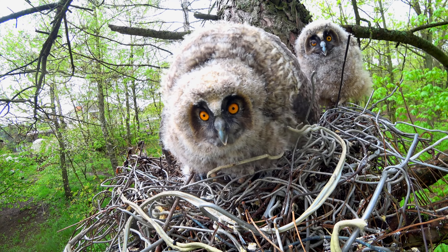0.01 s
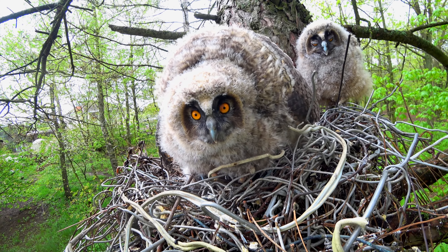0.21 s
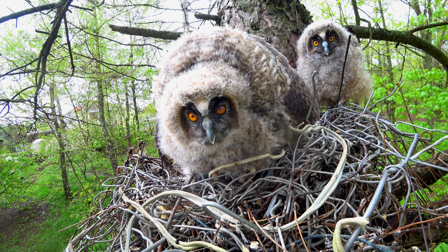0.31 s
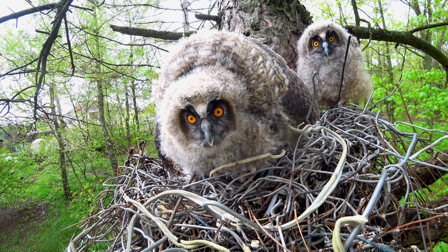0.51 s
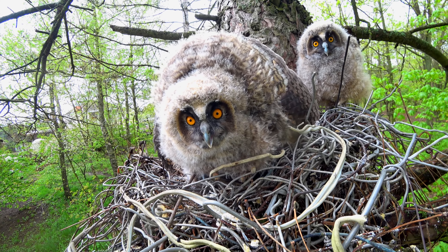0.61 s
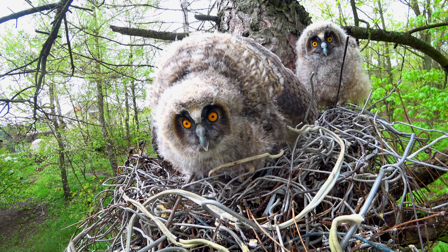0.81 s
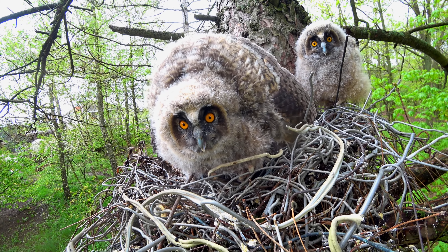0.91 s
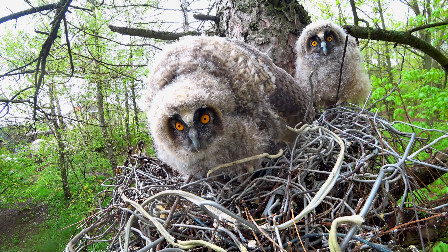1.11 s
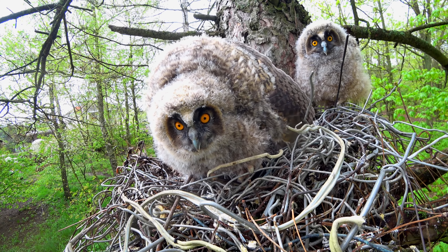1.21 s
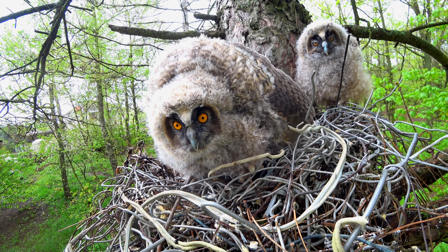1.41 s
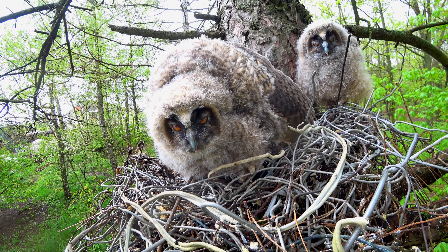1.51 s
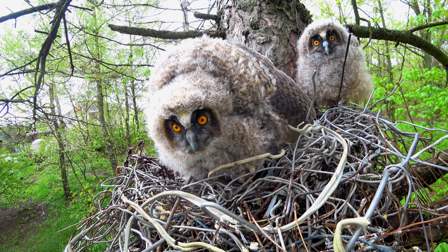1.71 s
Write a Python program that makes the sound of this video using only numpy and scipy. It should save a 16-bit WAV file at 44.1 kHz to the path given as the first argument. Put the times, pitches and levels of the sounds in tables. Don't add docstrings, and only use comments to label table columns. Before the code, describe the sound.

An owl chick hisses and snaps its bill close to a small outdoor microphone. Dry ticks at 0.14-0.16 s lead to a sharp, hollow clap at 0.22. A bright, breathy hiss starts abruptly near 0.35, peaks around 0.6 and fades by 0.92. A second clap hits at 1.08, with slight tree echo. Soft woodland wash continues, with faint high insect bursts, far peeps and low coos around 1.35-1.67.

```python
import sys
import numpy as np
from scipy import signal
from scipy.fft import rfft, irfft
from scipy.io import wavfile
from scipy.ndimage import uniform_filter1d

SR = 44100
rng = np.random.default_rng(int(sys.argv[2]) if len(sys.argv) > 2 else 0)


def invert_db(level):
    return 10 ** (np.asarray(level, dtype=float) / 20)


def pcm_store(signal):
    levels = np.round(np.clip(np.atleast_2d(signal), -1, 1) * 32767)
    wavfile.write(sys.argv[1], SR, levels.astype(np.int16).T)


N = 79380
EDGE_HZ = 15760


def evened(x):
    return x / np.sqrt(np.mean(x ** 2) + 1e-20)


def read(points, hz):
    f, value = np.transpose(points)
    return np.interp(np.log(hz + 1), np.log(f + 1), value)


def add(mix, s, sound):
    part = mix[round(s * SR):][:len(sound)]
    part += sound[:len(part)]


def coloured(x, gain):
    hz = np.fft.rfftfreq(x.shape[-1], 1 / SR)
    return irfft(rfft(x) * gain(hz), x.shape[-1])


def bell(hz, centre_hz, width_hz):
    return 1 / (1 + (2 * (hz - centre_hz) / width_hz) ** 2)


def field(patch_db, flicker_db):
    frames = N // 128 + 5
    a, b, c, d, patches = rng.standard_normal((frames, 257, 5)).T
    patches = uniform_filter1d(patches, 6, 0)
    patches = evened(uniform_filter1d(patches, 16, 1))
    flicker = evened(uniform_filter1d(rng.standard_normal(frames), 5))
    return a + 1j * b, c + 1j * d, invert_db(patch_db * patches + flicker_db * flicker)


def sound_of(z):
    x = signal.istft(z, nperseg=512, noverlap=384)[1][..., :N]
    return coloured(x, lambda hz: hz < EDGE_HZ)


def wood():
    # frequency in Hz, level in dB.
    wash = [(40, -29), (150, -22.5), (400, -6.5), (760, -6.5), (1500, -6), (4500, -18), (5900, -20),
            (16000, -25)]
    # centre in Hz, width in Hz, lift in dB.
    hollow = (1060, 260, 6)
    # frequency in Hz, correlation from -1 to 1.
    likeness = [(60, .98), (250, 0.97), (600, 0.34), (1600, .6), (5000, 0.27), (15000, 0.17)]
    # frequency in Hz, left over right in dB.
    balance = [(60, -0.32), (240, -1.4), (950, 0.23), (3770, 0.77), (15000, 1.0)]
    left_lag_s = 0.00026
    hz = np.fft.rfftfreq(512, 1 / SR)
    left, other, drift = field(patch_db=1.0, flicker_db=0.44)
    same = np.clip(read(likeness, hz), -1, 1)[:, None]
    tilt = invert_db(read(balance, hz) / 2)[:, None]
    turn = np.exp(2j * np.pi * hz * left_lag_s)[:, None]
    right = same * left * turn + np.sqrt(1 - same ** 2) * other
    hollow_hz, width_hz, lift_db = hollow
    colour = invert_db(read(wash, hz) + lift_db * bell(hz, hollow_hz, width_hz))[:, None]
    sides = np.array([left * tilt, right / tilt])
    return invert_db(-59) * evened(sound_of(sides * drift * colour))


def whistles(rows, width_hz, edge_s, rough):
    out = np.zeros(N)
    for s, length, db, hz0, hz1 in rows:
        t = np.arange(0, length, 1 / SR)
        pole = np.exp(-np.pi * width_hz / SR)
        noise = rng.standard_normal((len(t), 2)) @ [1, 1j]
        waver = 1 + rough * signal.lfilter([np.sqrt(1 - pole * pole)], [1, -pole], noise)
        phase = 2 * np.pi * np.cumsum(hz0 + (hz1 - hz0) * t / length) / SR
        tone = (waver * np.exp(1j * phase)).real
        fade = np.clip(np.minimum(t, length - t) / edge_s, 0, 1)
        add(out, s, invert_db(db) * tone * fade)
    return out


def insect():
    # start in seconds, length in seconds, level in dB, first and last pitch in Hz.
    bursts = [
        (0.0, .048, -73, 11250, 11250),
        (.905, .05, -73, 11250, 11250),
        (.96, .055, -73, 11250, 11250),
        (1.458, .095, -73, 11250, 11250),
        (1.772, .04, -73, 11250, 11250),
    ]
    return whistles(bursts, width_hz=80, edge_s=.004, rough=.3)


def birds():
    # start in seconds, length in seconds, level in dB, first and last pitch in Hz.
    calls = [
        (.09, .06, -73, 3850, 3950),
        (.27, .06, -75, 5350, 5400),
        (.28, .04, -74, 4000, 4000),
        (1.27, .06, -72, 4700, 4600),
        (1.37, .08, -77, 4700, 4600),
        (1.31, .07, -74, 3300, 3200),
        (1.61, .05, -70, 3700, 3500),
        (1.3, .1, -76, 4400, 4450),
    ]
    return whistles(calls, width_hz=250, edge_s=.012, rough=.8)


def ring(modes, pitch=0.94, cut_hz=900):
    out = np.zeros(800)
    for hz, db, t60, delay in modes:
        t = np.maximum(np.arange(800) / SR - delay, 0)
        out -= invert_db(db - 60 * t / t60) * np.sin(2 * np.pi * hz * pitch * t)
    band = signal.butter(2, [cut_hz, EDGE_HZ], "band", fs=SR, output="sos")
    return signal.sosfilt(band, out)


def bill_ticks():
    # start in seconds, level in dB.
    partings = [
        (.1351, -50),
        (.1393, -62),
        (.16385, -25),
    ]
    # frequency in Hz, level in dB, 60 dB decay in seconds, delay in seconds.
    tick_modes = [(14400, -6, 0.0015, 0.000083), (15500, 6, .002, 0.000082), (12300, -1, 0.0013, 0.000087),
                  (10700, -10, 0.0022, 0.00008), (6550, -12, 0.0023, 0.000039),
                  (4260, -4.5, 0.0032, 0.00018), (2820, -17, 0.0034, .0003), (1340, -18, 0.01, 0.00066),
                  (8200, -8, 0.0013, 0.000067)]
    out = np.zeros(N)
    for s, db in partings:
        add(out, s, invert_db(db) * ring(tick_modes))
    return out


def bill_snaps():
    # start in seconds, level in dB, lead of the tip tick in seconds, tip level in dB, pitch factor.
    claps = [
        (.21669, 1, .00535, -18, 1.0),
        (1.08258, 1.5, .0055, -18.5, 1.0),
    ]
    # frequency in Hz, level in dB, 60 dB decay in seconds, delay in seconds.
    horn_modes = [(4540, -19.5, 0.0033, 0.00019), (6800, -11, 0.0022, 0.0002247),
                  (10800, -8.5, 0.0011, 0.0003174), (11300, -19, 0.0011, 0.000197),
                  (15100, -52, 0.0044, .0001), (2900, -30, 0.0032, 0.00032)]
    # frequency in Hz, level in dB, 60 dB decay in seconds, delay in seconds.
    tip_modes = [(4800, -4, .007, .0001), (6200, -6, .006, .0001), (2700, -9, .004, .0001),
                 (3700, -11, .004, .0001), (7700, -11, .005, .0001), (10800, -22, .007, .0003),
                 (14600, -23, .007, .0001), (1600, -21, .007, .0006)]
    pop_top_hz, pop_low_hz, pop_fall_s = 4700, 1050, .0002
    pop_t60, pop_rise_s = 0.0027, .00005
    push_db, push_s = -27, 0.00017
    out, t = np.zeros(N), np.arange(800) / SR
    for s, db, ahead, tip_db, pitch in claps:
        hz = pop_low_hz * pitch + (pop_top_hz - pop_low_hz) * np.exp(-t / pop_fall_s)
        pop = -np.sin(2 * np.pi * np.cumsum(hz) / SR)
        pop *= (1 - np.exp(-t / pop_rise_s)) * invert_db(-60 * t / pop_t60)
        push = invert_db(push_db) * t / push_s * np.exp(1 - t / push_s)
        add(out, s, invert_db(db) * (pop - push + ring(horn_modes, pitch)))
        add(out, s - ahead, invert_db(tip_db) * ring(tip_modes))
    return out


def peaks(table, hz):
    power = sum(invert_db(db) ** 2 * bell(hz, f, width) ** 2.12 for f, width, db in table)
    return np.sqrt(power)


def hiss():
    # time in seconds, level in dB, throat share in dB.
    effort = [
        (0.335, -89, 33),
        (0.373, -47.5, -6),
        (0.385, -45, -4),
        (0.473, -37, -6),
        (0.599, -34.5, -3),
        (0.763, -37, -2),
        (0.879, -46, -1),
        (0.913, -66.5, 12),
        (0.925, -71, 5),
    ]
    # frequency in Hz, width in Hz, level in dB.
    tongue_jet = [(4590, 1950, -5), (6500, 1660, -3.5), (7370, 450, 3), (8370, 990, 2), (9320, 940, 1),
                  (11080, 1930, 0.5), (13400, 1700, -4), (15200, 1000, -6.5)]
    # frequency in Hz, width in Hz, level in dB.
    throat_modes = [(1490, 950, 0.5), (1860, 1430, 4.5), (2837, 410, 2), (3470, 1600, -5)]
    # frequency in Hz, width in Hz, depth in dB.
    cavities = [(5650, 500, -4), (10000, 300, -7), (7000, 200, -2)]
    hz = np.fft.rfftfreq(512, 1 / SR)
    jet_air, throat_air, drift = field(patch_db=.9, flicker_db=.6)
    dips = invert_db(sum(db * bell(hz, f, width) for f, width, db in cavities))
    throat_cut = 1 / np.sqrt(1 + (867 / (hz + 1)) ** 6)
    jet_gain = peaks(tongue_jet, hz) * dips
    throat_gain = peaks(throat_modes, hz) * throat_cut * dips
    jet = evened(sound_of(jet_air * drift * jet_gain[:, None]))
    throat = evened(sound_of(throat_air * drift * throat_gain[:, None]))
    s, level_db, share_db = np.transpose(effort)
    t = np.arange(N) / SR
    share = invert_db(np.interp(t, s, np.minimum(share_db, 4)))
    return invert_db(np.interp(t, s, level_db, -150, -150)) * (jet + throat * share)


def squeaks():
    # start in seconds, length in seconds, level in dB, first and last pitch in Hz.
    catches = [
        (.343, .035, -63, 5450, 6150),
        (.345, .03, -60, 11000, 12100),
    ]
    return whistles(catches, width_hz=150, edge_s=.01, rough=.35)


def coos():
    # start in seconds, length in seconds, level in dB, first and last pitch in Hz.
    low_calls = [
        (1.35, .165, -67, 600, 662),
        (1.49, .18, -66, 662, 630),
        (.865, .065, -58, 915, 925),
        (.92, .13, -68, 920, 920),
        (.9, .14, -69, 530, 530),
    ]
    return whistles(low_calls, width_hz=8, edge_s=.025, rough=.12)


def ports(x, direct=0.63, lag=-1.1, scatter=0.66):
    # frequency in Hz, side level in dB.
    side_curve = [(100, -23), (400, -10), (800, 2), (1300, -5), (2300, -12), (4400, -16), (8000, -25.5),
                  (15000, -23)]
    t = np.arange(260) / SR
    smear = rng.standard_normal(260) * invert_db(-60 * t / .008)
    loose = signal.oaconvolve(x, smear / np.linalg.norm(smear))[:N]
    side = coloured(scatter * loose, lambda hz: invert_db(read(side_curve, hz)))
    side += coloured(x, lambda hz: direct * invert_db(read(side_curve, hz)) * np.exp(1j * lag))
    return np.array([x + side, x - side])


def trees(x):
    # frequency in Hz, 60 dB decay in seconds.
    decay = [(300, 0.13), (2000, 0.47), (6000, 0.26), (12000, 0.12)]
    # frequency in Hz, level in dB.
    tone = [(200, -10), (1500, 0.5), (7000, 5), (11000, -3.5)]
    taps = np.zeros((2, SR // 2))
    at = np.arange(200, SR // 2 - 20, 20) + rng.integers(0, 20, (2, (SR // 2 - 201) // 20))
    np.put_along_axis(taps, at, rng.choice([-1., 1.], at.shape), 1)
    hz, t, z = signal.stft(taps, SR, nperseg=128)
    tail_db = read(tone, hz)[:, None] - 60 * t / read(decay, hz)[:, None]
    tail = signal.istft(z * invert_db(tail_db), SR, nperseg=128)[1]
    tail = invert_db(-33) * tail / np.linalg.norm(tail[0])
    return signal.fftconvolve(x[None], tail, axes=1)[:, :N]


def scene():
    chick = bill_ticks() + bill_snaps() + hiss() + squeaks()
    far = insect() + birds() + coos()
    return wood() + far * invert_db([[1.], [-1.]]) + ports(chick) + trees(chick)


def top_cut(x):
    return signal.sosfilt(signal.butter(12, 17090, fs=SR, output="sos"), x)


def record(dry):
    steep_top = signal.firwin(101, 16400, window=("kaiser", 8), fs=SR)
    mix = signal.oaconvolve(dry, steep_top[None], "same")
    return top_cut(mix)


dry = scene()
out = record(dry)
pcm_store(out)
```